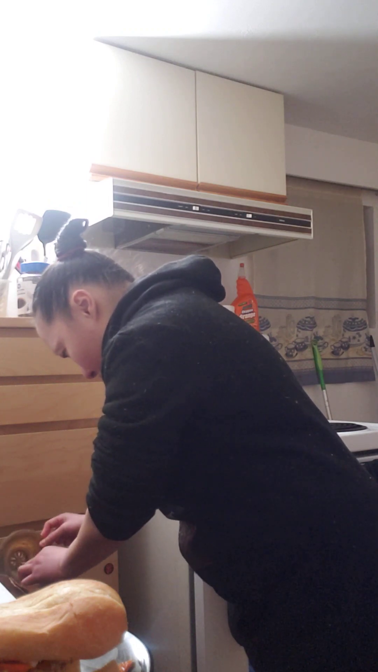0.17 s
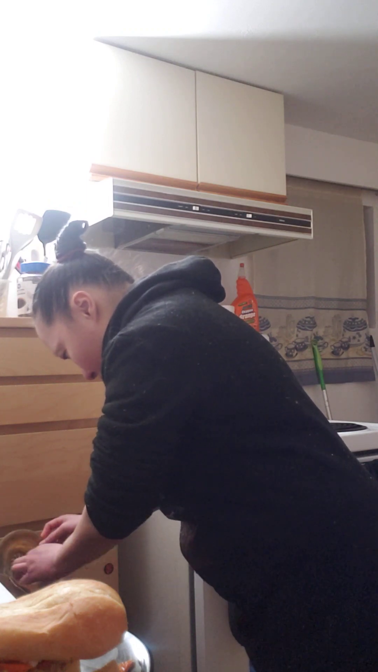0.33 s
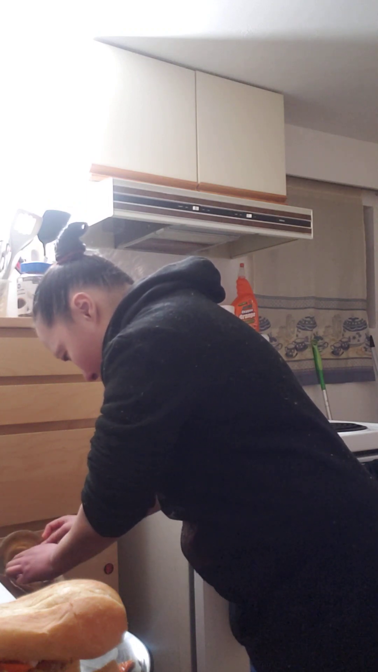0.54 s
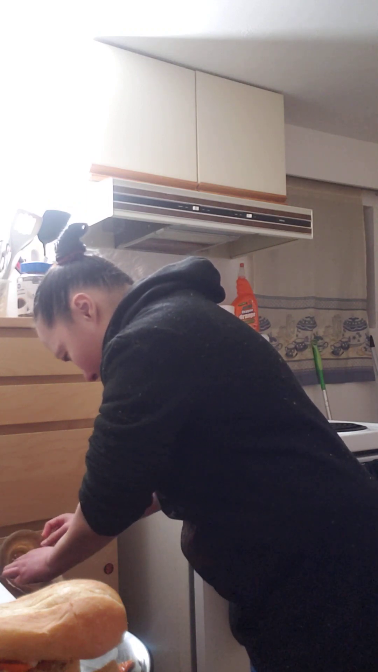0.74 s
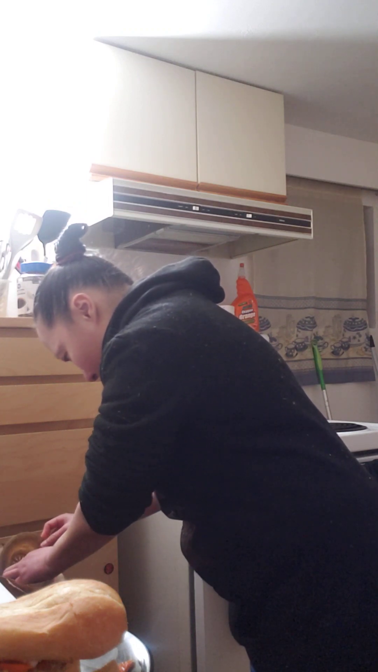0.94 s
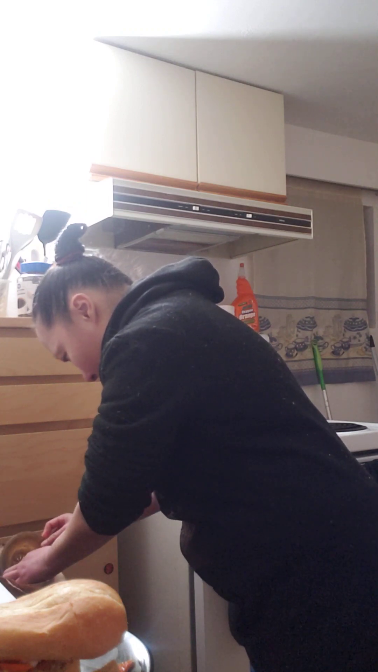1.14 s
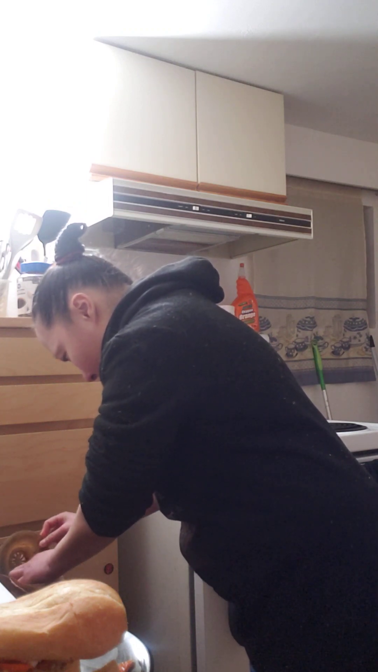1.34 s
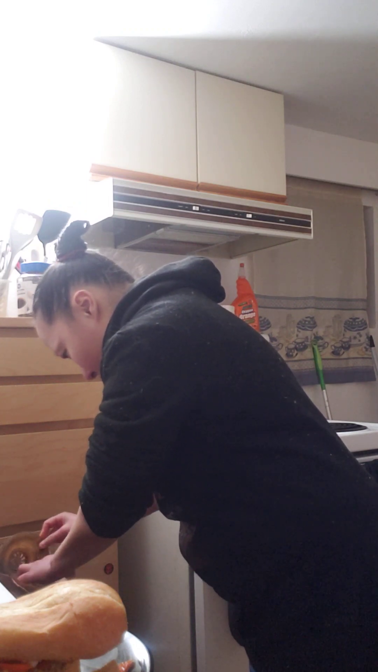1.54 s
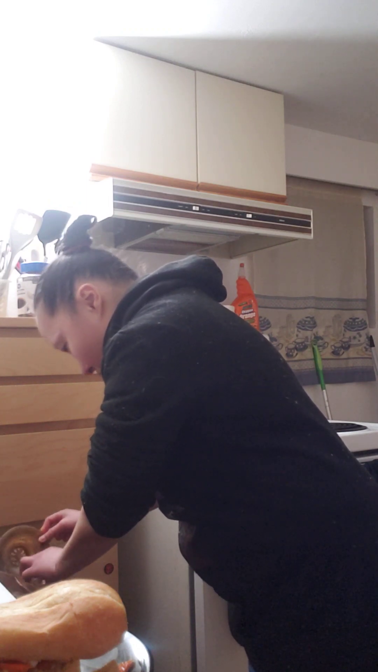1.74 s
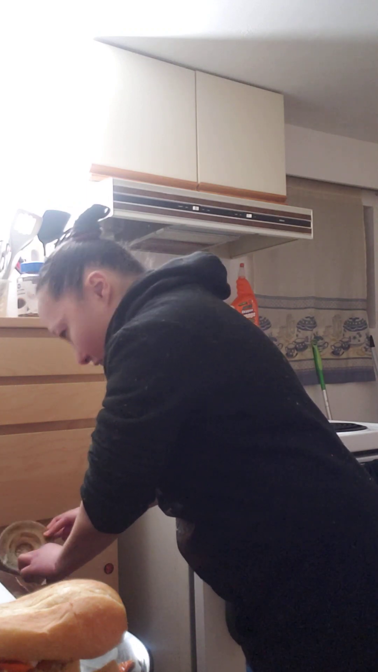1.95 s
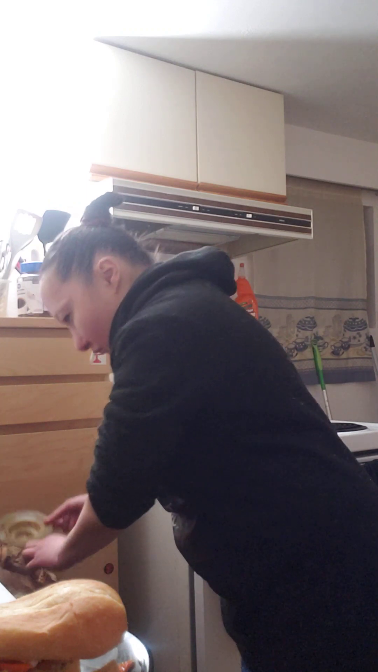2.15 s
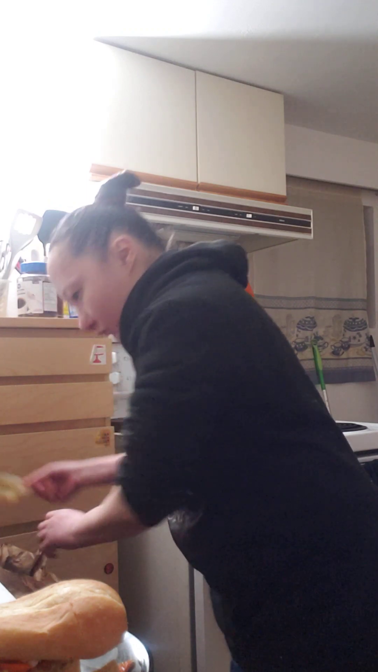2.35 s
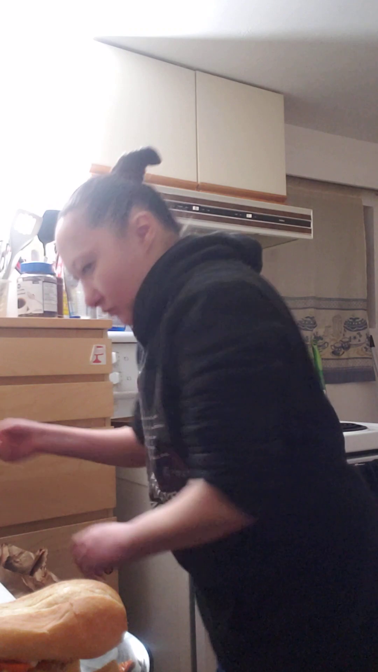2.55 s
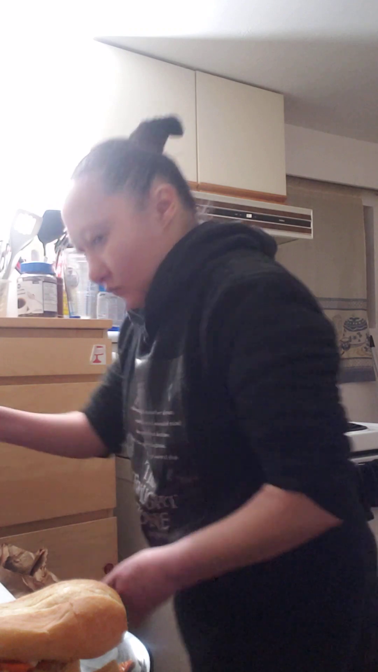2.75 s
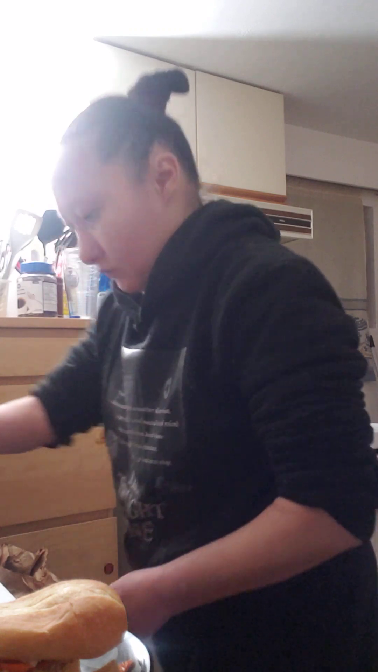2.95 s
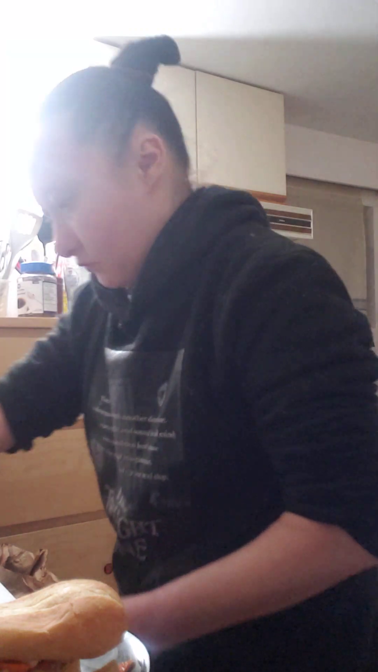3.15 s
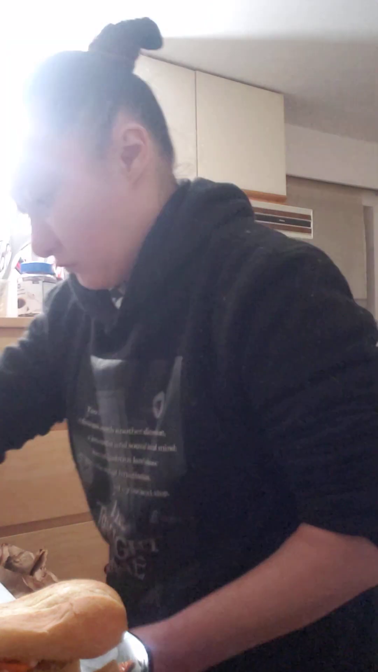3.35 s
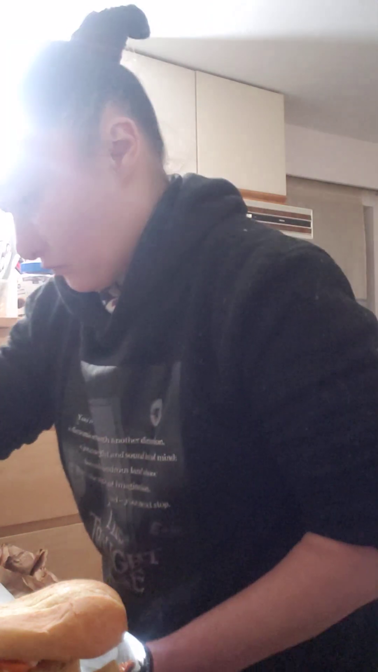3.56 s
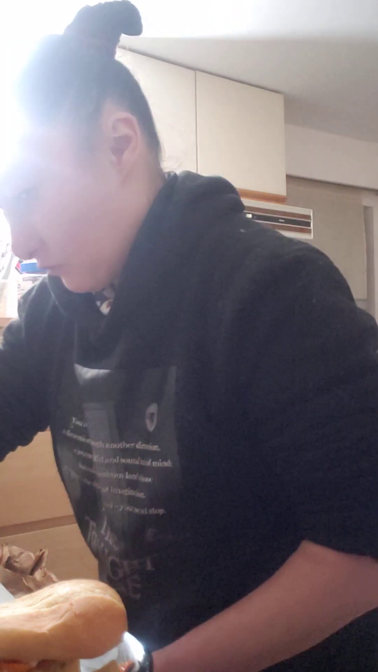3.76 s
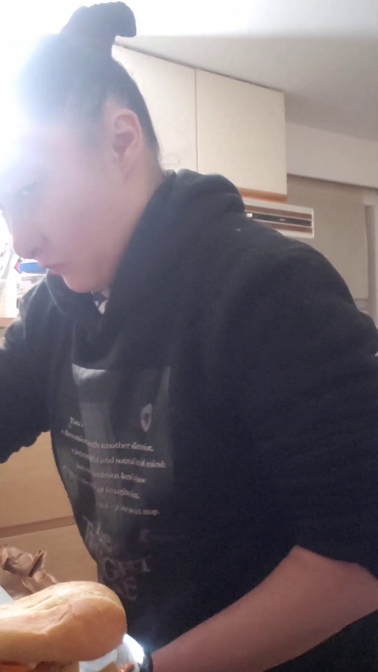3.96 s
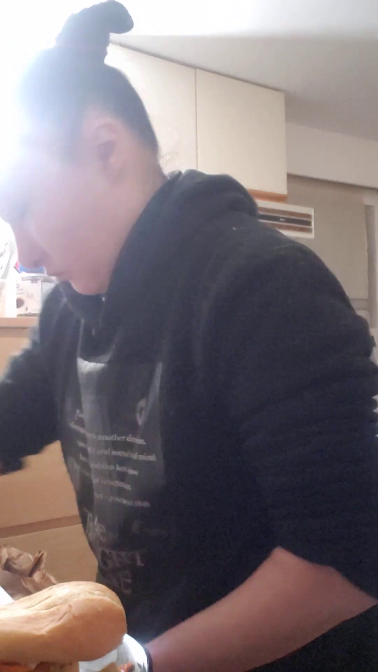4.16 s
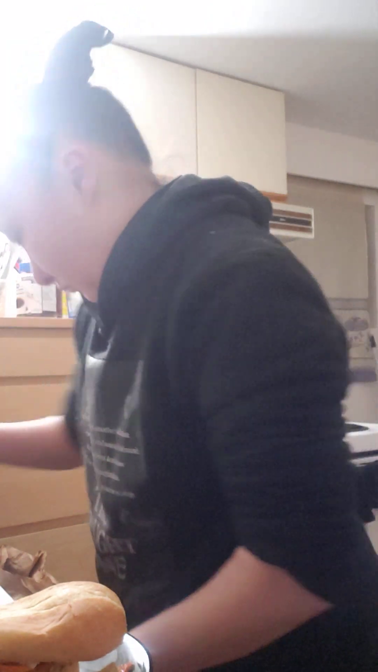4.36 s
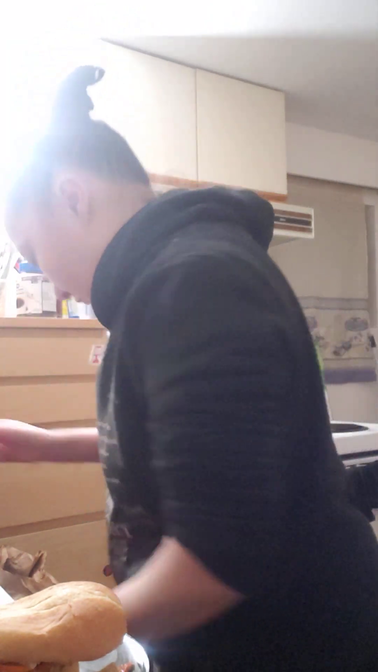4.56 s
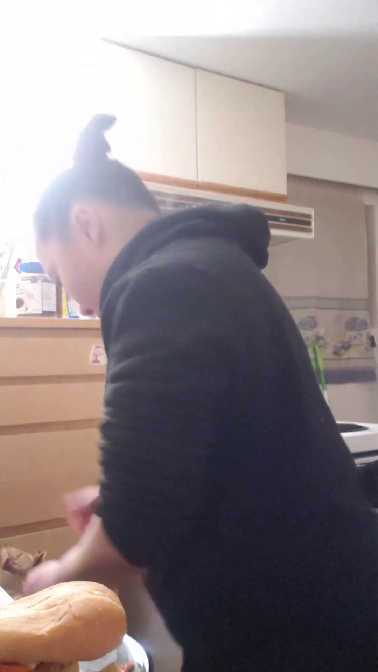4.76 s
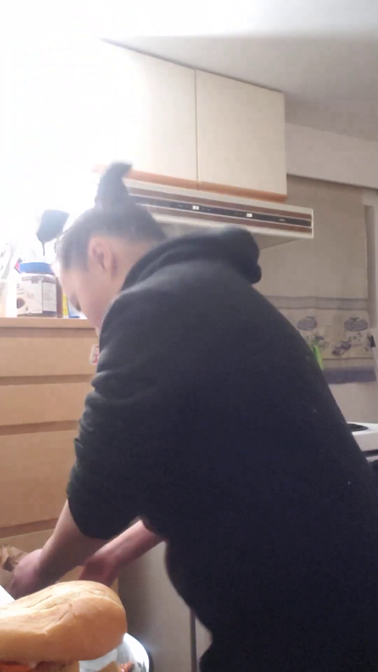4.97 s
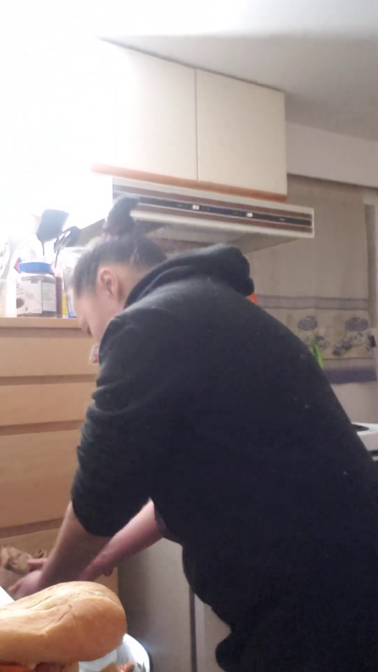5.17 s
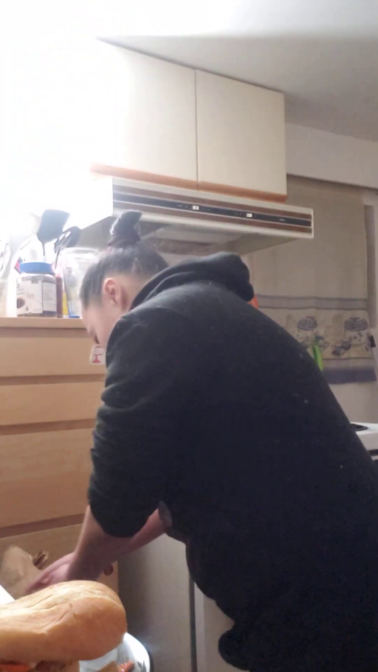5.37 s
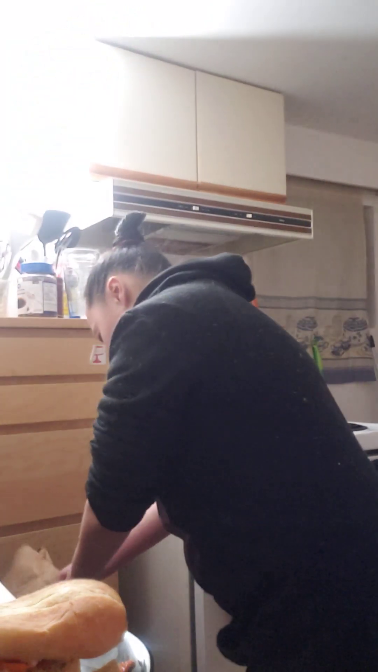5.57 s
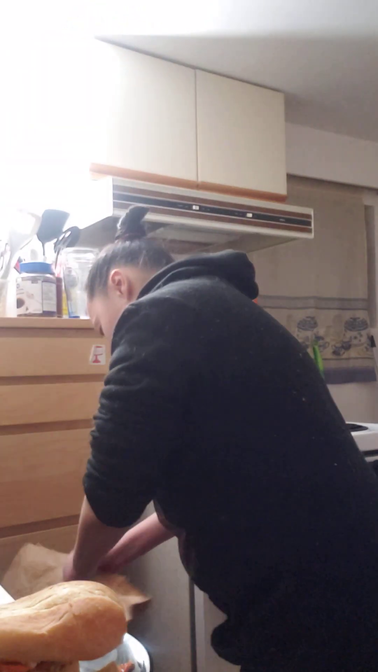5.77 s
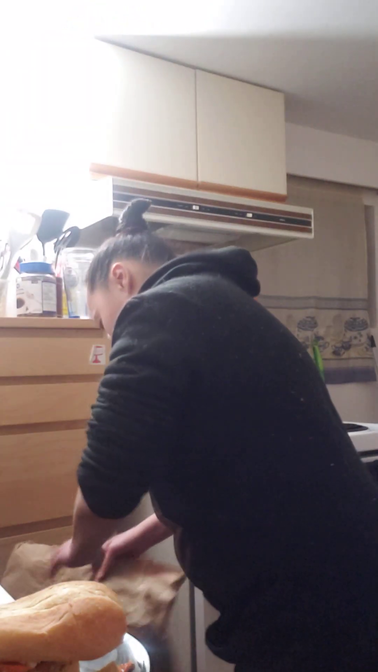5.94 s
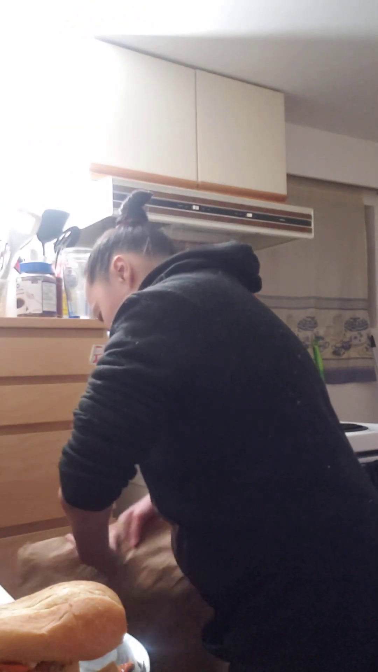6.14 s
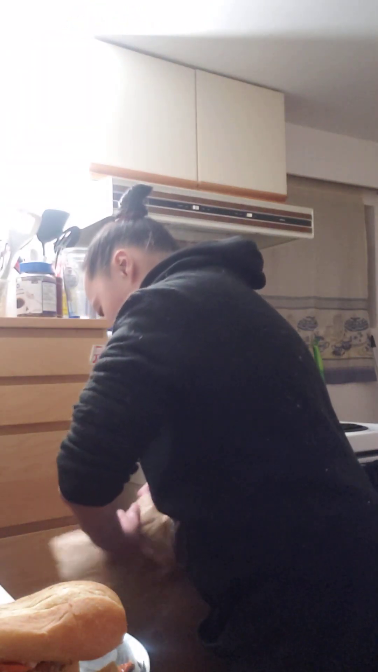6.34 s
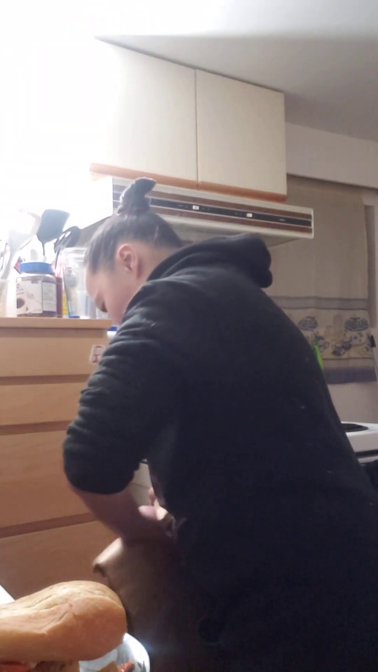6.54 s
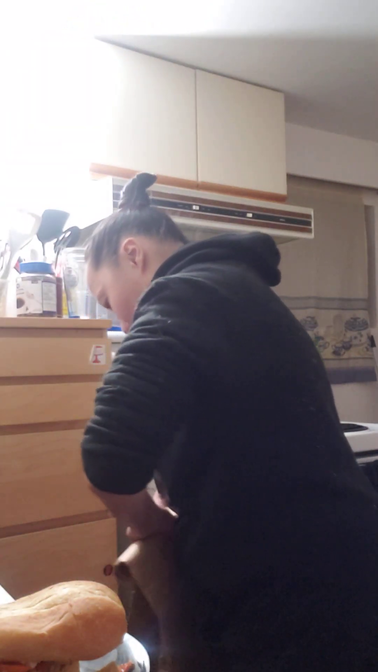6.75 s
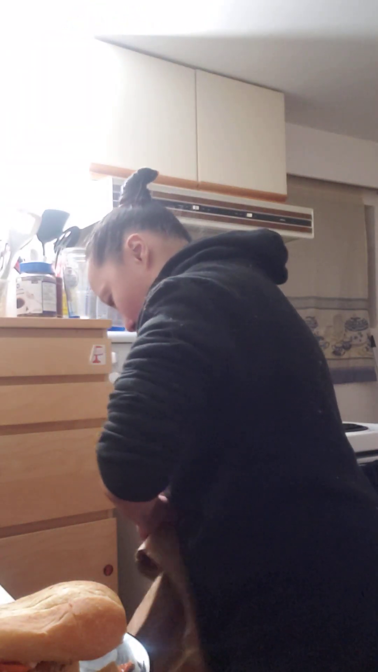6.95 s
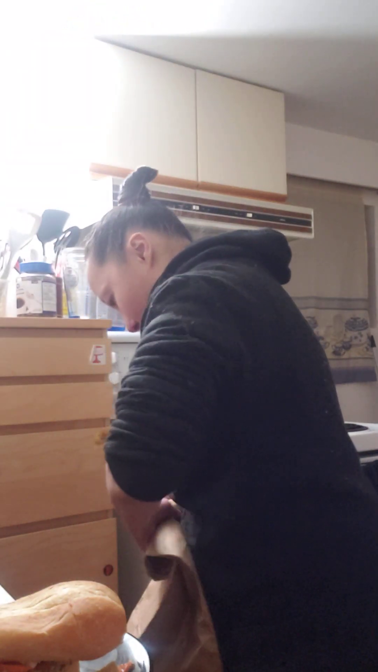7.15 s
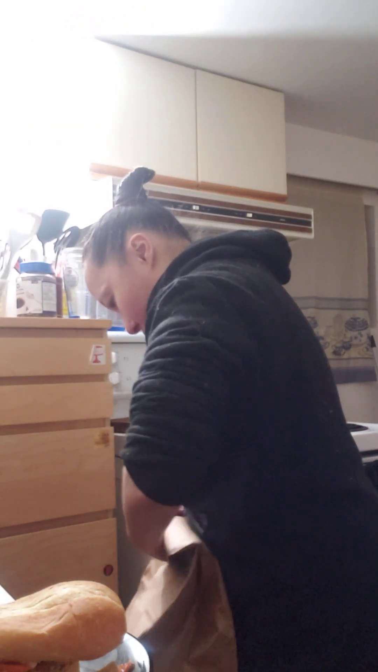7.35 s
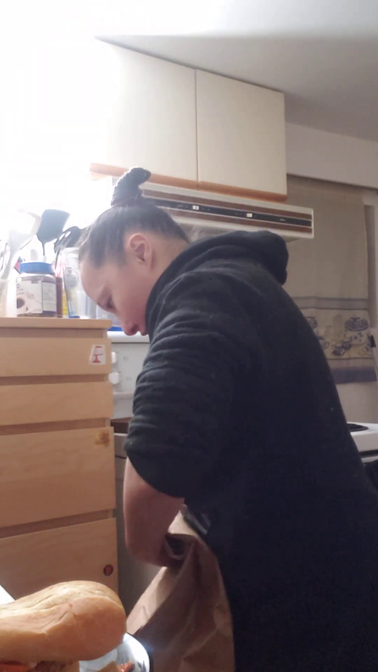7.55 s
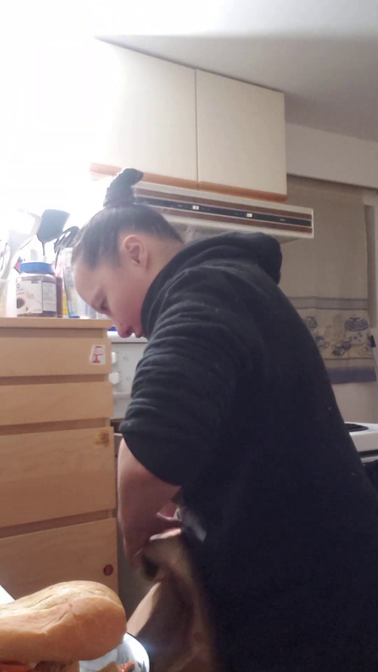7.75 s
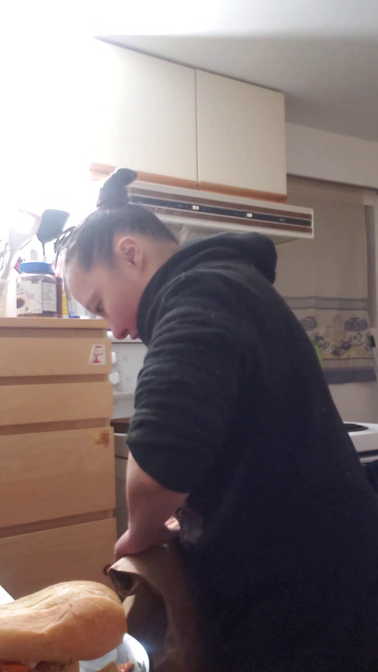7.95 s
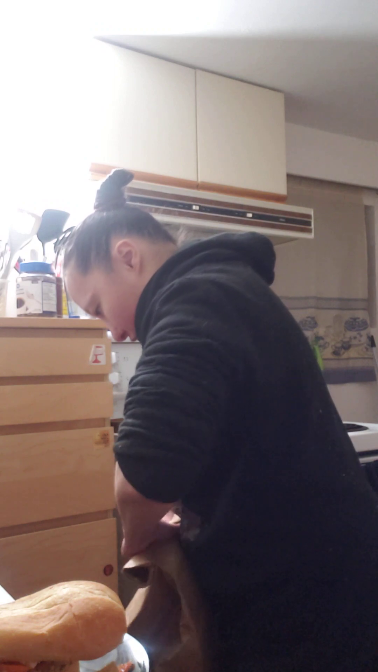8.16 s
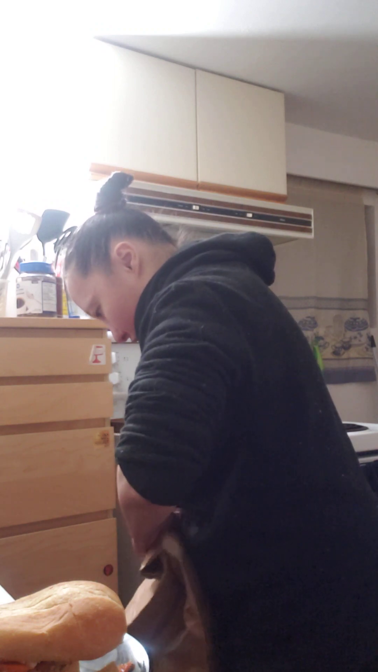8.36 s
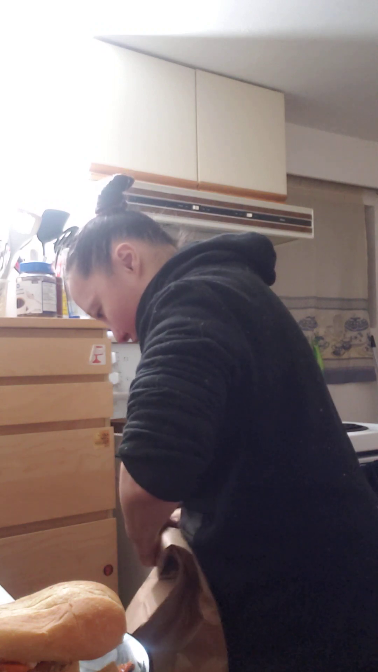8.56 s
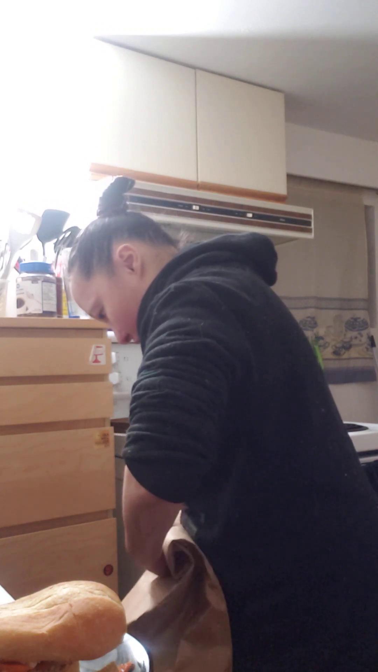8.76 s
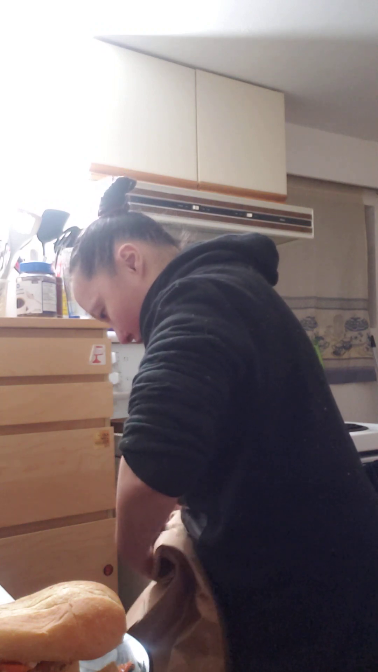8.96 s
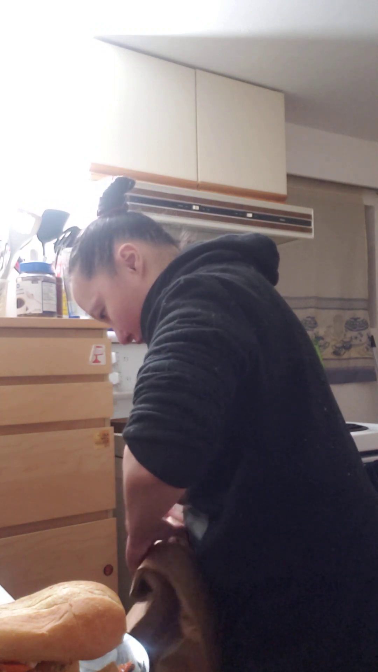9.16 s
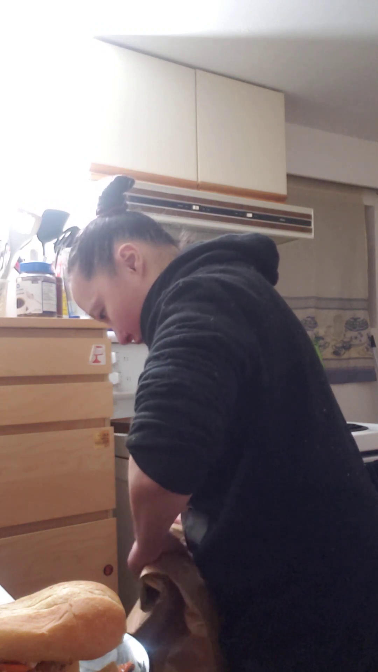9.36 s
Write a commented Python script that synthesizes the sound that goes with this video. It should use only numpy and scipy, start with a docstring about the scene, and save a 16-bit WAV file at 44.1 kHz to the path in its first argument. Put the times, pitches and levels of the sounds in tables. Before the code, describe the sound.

In a small kitchen, a thin wrapper rustles quietly while things are tapped down on a counter. After a lull, one object lands with a sharp knock. Then a paper bag is gripped, lifted and folded, crackling and snapping loudly with hollow pops and a few dull bumps. A fridge hums faintly throughout, and the microphone picks up the handling with a short room echo.

```python
"""A thin wrapper rustles over a fridge's hum in a small kitchen; things are tapped down, one knocked hard.
Then a paper bag, the loudest source, is gripped, lifted and folded: buckling creases snap and crackle,
its walls flap and pop, the air inside resonates, and its weight bumps the counter.
Impacts excite the counter's damped modes. Two microphones hear the handling mostly as reverberation."""
import sys
import numpy as np
from scipy import signal
from scipy.fft import rfft, irfft
from scipy.io import wavfile

SR = 44100
rng = np.random.default_rng(int(sys.argv[2]) if len(sys.argv) > 2 else 0)


def inscribe(sig):
    """Save sig as 16-bit PCM at rate SR to the path in sys.argv[1].

    A 1-D sig is mono; a 2-D sig holds one channel per row.
    Samples are clipped to [-1, 1] before scaling.
    """
    pcm = np.round(np.clip(np.atleast_2d(sig).T, -1, 1) * 32767)
    wavfile.write(sys.argv[1], SR, pcm.astype(np.int16))


N = 414981

# squeezes of the bag: start_s, length_s, crackle_db, relative_treble_db, flap_db
SQUEEZES = [(5.22, .09, -55.5, 2, -64), (5.298, 0.11, -49, -10, -50.5), (5.377, 0.03, -48, 2, -47.5),
            (5.514, 0.044, -44, -3, -41.5), (5.59, 0.13, -51, -1.5, -66), (5.707, 0.033, -41.5, 0, -49.5),
            (5.814, 0.052, -44, -2.5, -43.5), (6.098, 0.029, -53, -16, -63), (6.216, 0.044, -51, -5, -53),
            (6.257, 0.017, -40, -8, -42.5), (6.357, 0.04, -58, 0, -46.5), (6.411, 0.067, -37.5, -3, -39),
            (6.462, 0.029, -38, -2.5, -37), (6.566, 0.18, -49.5, -5, -43.5), (6.688, 0.046, -40, -3, -37),
            (6.731, 0.071, -39, -1.5, -40), (6.852, 0.13, -45, -4, -40), (7.018, 0.11, -41.5, -1.5, -38.5),
            (7.067, 0.098, -37.5, -2, -38), (7.223, 0.044, -35.5, 1, -36.5),
            (7.384, 0.13, -37.5, -2.5, -35), (7.536, 0.13, -37, -2.5, -39.5),
            (7.667, 0.066, -38.5, -1, -40.5), (7.737, 0.17, -43.5, 4, -44.5), (7.887, 0.036, -42, -7, -44),
            (7.97, 0.051, -50, -14, -39), (8.126, 0.077, -42.5, -6, -44.5), (8.231, 0.092, -34.5, 0, -35),
            (8.362, 0.11, -41, -3, -41), (8.46, 0.13, -42.5, 0, -43), (8.602, 0.096, -43.5, -5, -39.5),
            (8.721, 0.015, -38.5, 0, -33), (8.799, 0.066, -39.5, -19, -35), (8.86, 0.053, -38, -15, -36),
            (8.948, .07, -41.5, -5, -37.5), (9.059, 0.054, -37, 1, -40.5), (9.108, 0.096, -41, -2, -39.5),
            (9.243, 0.087, -37.5, -4, -35), (9.39, .015, -28, 0, -40)]
# the bag swaying in the hands: time_s, rustle_db, hollow_db, bump_db
SWAY = [(5.2, -71, -58.5, -59), (5.28, -50, -50.5, -53), (5.5, -55.5, -57, -53), (5.84, -51, -44.5, -59),
        (5.95, -64, -60.5, -53), (6.07, -65.5, -80, -76), (6.2, -67, -58, -66), (6.3, -66, -54, -60),
        (6.45, -54, -43.5, -47), (6.62, -60, -51, -60), (6.72, -49, -44.5, -44), (7.0, -62, -49, -50.5),
        (7.45, -42, -42, -44), (7.7, -53, -44.5, -44), (7.92, -56, -46, -53.5), (8.1, -49, -45.5, -49),
        (8.25, -48, -42.5, -51), (8.4, -54, -52, -51.5), (8.85, -46, -43, -44.5), (9.2, -42, -49, -49),
        (9.41, -58, -43, -47)]
def bag():
    """Forced vibration: squeezing and swaying, added in power, drive creases, walls and enclosed air."""
    start_s, length_s, crackle_db, treble_db, flap_db = np.transpose(SQUEEZES)
    level, top, flap = (bursts(start_s, length_s, db, rise_s=0.01, fall_db_per_s=209)
                        for db in (crackle_db, crackle_db + treble_db, flap_db))
    held, rustle_db, hollow_db, _ = curves(SWAY)
    rustle = held * gain_of(rustle_db)
    paper = creases(np.hypot(level, rustle), np.hypot(top, rustle))
    pushes = crackle(per_s=1100, spread_db=2.85, clump_s=0.039, clump_db=1.57)
    flapping = walls(pushes * np.hypot(flap, rustle * gain_of(-2.5)))
    return paper + flapping + hollow(held * pushes * gain_of(hollow_db))

# spectrum of a buckling crease: frequency_hz, density_db
CREASE_SPECTRUM = [(880, -37.5), (1500, -3), (1670, -2.5), (2300, -6), (4420, -2), (7390, -5.5),
                   (8160, -9.5), (9010, -7), (12400, -9), (15200, -12), (16000, -12)]
def creases(level, top):
    """Buckling avalanches: creases give way in clumps of clicks, louder just after a snap."""
    clicks = crackle(per_s=2800, spread_db=2.8, clump_s=0.008, clump_db=1.8)
    return with_treble(colour(clicks, CREASE_SPECTRUM), top / level) * level * (0.57 + 0.5 * aftermath())

# spectrum of a paper wall: frequency_hz, density_db
WALL_SPECTRUM = [(320, -22.5), (550, -6.5), (603, -11), (762, -0.5), (1030, -6), (1200, -2.5), (1450, -8),
                 (1680, -7.5), (3000, -13), (3900, -24.5), (6600, -120)]
def walls(pushes):
    """Panel radiation: the walls turn pushes into midrange flapping."""
    return colour(pushes * (0.83 + 0.16 * aftermath()), WALL_SPECTRUM)

# modes of the air in the bag: pitch_hz, bandwidth_hz, level_db
CAVITY_MODES = [(265, 38, -9.5), (338, 75, -8.5), (428, 36, -0.5), (482, 43, -4), (556.6, 37, -10.5)]
def hollow(puffs):
    """Cavity resonance: puffs ring the air's modes, summed with alternating polarity."""
    return sum((-1) ** k * gain_of(db) * resonate(puffs, hz, width_hz)
               for k, (hz, width_hz, db) in enumerate(CAVITY_MODES))

# single creases giving way: start_s, level_db, pitch_hz, relative_flap_db, relative_treble_db
SNAPS = [(5.217, -57, 9680, -11, 1), (5.231, -60, 5560, -6, -12), (5.2604, -54, 4080, -14, -12),
         (5.3244, -30, 2230, -7, -24), (5.336, -28.5, 2110, -6, -33), (5.5369, -30, 2480, -11, -24),
         (5.628, -35.5, 4600, 2, 3), (5.757, -27.5, 2820, -2.5, -10), (5.8276, -31.5, 4740, -17, 3),
         (6.113, -37.5, 5130, -5, -11), (6.2242, -43, 2180, 4, -8), (6.269, -30, 5100, -10, -1.5),
         (6.349, -36.5, 12900, 2.5, 3), (6.4094, -23.5, 6450, -9, -4), (6.4534, -24, 3250, -21, -5),
         (6.4796, -16, 2520, -9.5, -6), (6.565, -28, 2880, -20, -6.5), (6.6924, -29, 3130, 2.5, -0.5),
         (6.734, -24.5, 2700, -5.5, -0.5), (6.8054, -23, 2020, -29, -14), (6.8624, -37.5, 2740, 9.5, -18),
         (6.9339, -34.5, 2440, -4, 2), (6.974, -30, 2840, -0.5, -25), (7.015, -20.5, 1970, -21, -21),
         (7.0754, -33, 5300, -9, -15), (7.216, -32, 2350, -3, -19), (7.2386, -25, 10200, -22, -0.5),
         (7.3201, -25, 2600, -1.5, -27), (7.3684, -21.5, 2120, -11.5, -22), (7.4041, -14, 3800, -17, -9),
         (7.4396, -17, 2090, -7, -26), (7.546, -19, 4250, -11, -7.5), (7.5664, -20.5, 4070, -8, -6),
         (7.6574, -19, 2400, -17, -5.5), (7.7238, -32.5, 2080, 3, -14), (7.9014, -23, 4930, -3, -11),
         (7.91, -25.5, 2520, -18, -16), (7.9934, -29, 2570, -12, -20), (8.062, -42, 2860, 10.5, -18),
         (8.1304, -25, 2800, -9, -20), (8.1776, -25, 2170, -7, -23), (8.2207, -22, 2500, -2, -12),
         (8.2425, -21, 12800, -33, -2), (8.452, -27.5, 3100, -1, -3), (8.539, -29.5, 2050, -1, -2),
         (8.5951, -23.5, 3130, -5.5, -19), (8.6484, -25.5, 1970, -0.5, -7.5), (8.7031, -31, 2400, -13, -16),
         (8.7273, -26, 4760, -15, -13), (8.744, -15.5, 7700, -26, -12), (8.7987, -24, 6410, -21, -15),
         (8.8204, -31, 2000, -11, -17), (8.8747, -23, 2850, -1.5, -19), (9.008, -27, 2020, -17, -14),
         (9.0444, -27.5, 9010, -20, -1.5), (9.0673, -23.5, 4720, -2.5, -1.5), (9.2374, -31.5, 2560, 8, -17),
         (9.2532, -29, 2000, -6, -9), (9.2828, -20.5, 2060, -6, -20), (9.3974, -15.5, 2500, -5, -22)]
def snaps():
    """Sudden buckling: an impulse rings a crease at its own pitch and kicks the wall."""
    body, top, kick = np.zeros((3, N))
    click = signal.unit_impulse(400)
    for s, db, hz, flap_db, treble_db in SNAPS:
        add(body, s, gain_of(db + 11) * (click + 0.31 * resonate(click, hz, 0.25 * hz)))
        add(top, s, gain_of(db + treble_db + 27) * click)
        add(kick, s, gain_of(db + flap_db + 18.5) * click)
    return colour(crossover(body, top, 12700), CREASE_SPECTRUM) + colour(kick, WALL_SPECTRUM)

def aftermath(fade_s=0.03):
    """Relaxation: a snap sets off neighbouring creases; their activity peaks at 1 and fades."""
    t, start_s = np.arange(N) / SR, np.transpose(SNAPS)[0]
    latest_s = start_s[np.maximum(np.searchsorted(start_s, t) - 1, 0)]
    return np.exp(-abs(t - latest_s) / fade_s)

# walls popping in or out: start_s, level_db, pitch_hz
POPS = [(5.323, -22.5, 1300), (5.538, -29, 420), (6.347, -24.5, 854), (6.476, -23, 796),
        (6.628, -28.5, 487), (6.69, -23, 505), (6.863, -19.5, 475), (7.054, -28, 460), (7.116, -21, 444),
        (7.242, -24.5, 437), (7.287, -28, 444), (7.367, -23.5, 450), (7.447, -18, 487), (7.521, -23, 500),
        (7.566, -20, 814), (7.657, -19.5, 450), (7.877, -17.5, 600), (7.995, -19, 794), (8.286, -28, 482),
        (8.467, -20, 486), (8.54, -22.5, 428), (8.594, -29, 470), (8.704, -21, 437), (8.805, -24, 450),
        (8.868, -16, 492), (8.969, -22.5, 730), (9.066, -17.5, 470), (9.118, -19, 460), (9.202, -25.5, 440),
        (9.239, -27, 425), (9.281, -20, 430)]
def pops():
    """Snap-through: a wall of the bag flips over and booms."""
    return booms(POPS, cycles=3.6, size=2000)

# the filled bag striking the counter: start_s, level_db, pitch_hz
KNOCKS = [(5.329, -53, 119), (6.479, -39, 61.9), (6.798, -34, 116), (7.029, -34, 59.2),
          (7.329, -33.5, 53.5), (7.468, -34, 126), (7.509, -31, 56), (7.658, -26.5, 79), (8.27, -39, 109),
          (8.594, -33, 70.0), (8.719, -35, 87.5), (9.062, -35, 140), (9.279, -37, 143)]
def knocks():
    """Damped impact: each knock of the bag dies within a few bass cycles."""
    return 0.62 * booms(KNOCKS, cycles=2.16, size=9000)

# spectrum of the bag bumping the counter: frequency_hz, density_db
BUMP_SPECTRUM = [(15, -45), (25, 12), (41, -12), (65, -2.5), (91, 0.5), (155, 1), (167, -0.5), (200, -42),
                 (260, -30), (440, -120)]
def bumps():
    """Random excitation: small bumps of the swaying bag merge into a rumble."""
    held, _, _, bump_db = curves(SWAY)
    contacts = crackle(per_s=300, spread_db=1.1, clump_s=0.0079, clump_db=0.3)
    return held * colour(contacts * gain_of(bump_db), BUMP_SPECTRUM, size=8192)

# things set down: start_s, level_db, pitch_hz, thud_db, relative_treble_db
TAPS = [(0.174, -52, 1150, -54, -9), (0.273, -65, 1080, -46, -11), (0.317, -34, 1050, -38, -15),
        (0.704, -53, 1260, -60, -22), (0.961, -54, 1110, -63, -10), (1.37, -50, 1140, -44, -13),
        (1.772, -37.5, 1870, -37, -20), (2.198, -32.5, 850, -47, -32), (2.268, -62, 832, -49, -11),
        (3.574, -41, 1500, -32.5, -18), (3.592, -41.5, 988, -26.5, -29), (3.847, -60, 888, -30, -20),
        (4.007, -19.5, 1090, -13.5, -3), (4.021, -21.5, 1050, -54, -27), (4.045, -35, 1050, -40, -4),
        (4.38, -72, 824, -43, -16)]
# spectrum of their contact: frequency_hz, density_db
CONTACT_SPECTRUM = [(290, -26), (500, -2.5), (1210, -3.5), (1360, 1), (1530, -4), (2100, -3.5), (4030, -10),
                    (12900, -8.5), (16000, -14)]
def taps():
    """Impact and free vibration: returns the contact clicks and the objects' brief rings."""
    body, top, rings = np.zeros((3, N))
    click = signal.unit_impulse(800)
    for s, db, hz, _, treble_db in TAPS:
        add(body, s, gain_of(db + 12) * click)
        add(top, s, gain_of(db + treble_db + 22.5) * click)
        add(rings, s, gain_of(db + 14.5) * resonate(click, hz, 0.18 * hz))
    return colour(crossover(body, top, 3000), CONTACT_SPECTRUM), rings

# modes of the counter: pitch_hz, level_db, t60_s
COUNTER_MODES = [(56, -4, 0.29), (124, -2.5, .25), (144.3, 2, 0.32), (195, 5.5, 0.088), (224.5, -3.5, 0.34),
                 (275.7, 0.5, 0.31), (338, -5.5, 0.4), (369.6, -1.5, 0.31), (438, -6.5, 0.36),
                 (539, -11, 0.2), (598, -18, .15), (1090, -10, 0.05)]
def counter():
    """Modal superposition: the counter thuds under each tap as a sum of decaying sines."""
    out, t = np.zeros(N), np.arange(SR // 2) / SR
    ring = sum(gain_of(db - 60 * t / t60) * np.sin(2 * np.pi * hz * t) for hz, db, t60 in COUNTER_MODES)
    ring = ring / abs(ring).max() * np.minimum(t / 0.0038, 1)
    for s, _, _, thud_db, _ in TAPS:
        add(out, s, gain_of(thud_db) * ring)
    return out

# rustles of the wrapper: start_s, length_s, crackle_db, relative_treble_db, fold_db
RUSTLES = [(-0.04, 0.078, -72, 8.5, -60), (0.025, 0.096, -72, 8.5, -67), (0.146, 0.038, -65, -5, -63),
           (0.25, 0.076, -63.5, 10, -55.5), (0.3, 0.035, -49, -6, -57), (0.338, 0.092, -58.5, 5, -56.5),
           (0.498, 0.36, -84, 7.5, -79), (0.692, 0.028, -74, -6, -61), (0.941, 0.028, -66.5, 8.5, -61.5),
           (1.067, 0.07, -75, 8.5, -64.5), (1.34, 0.3, -58, 2.5, -60.5), (1.613, 0.13, -60.5, -0.5, -60),
           (1.746, 0.033, -51, 0.5, -49), (1.888, 0.14, -76, 8.5, -69.5), (2.107, 0.079, -67.5, 8.5, -75),
           (2.152, 0.032, -52.5, -1.5, -49), (2.232, 0.013, -69, 14.5, -76), (2.74, .07, -80, 6, -80),
           (2.85, .06, -84, 2, -65), (2.925, 0.068, -66.5, 0, -64), (3.564, .03, -72, -3, -57),
           (3.83, 0.19, -85, 10, -71.5)]
# spectra of its film and its folds: frequency_hz, density_db
FILM_SPECTRUM = [(1180, -40), (2000, 2), (3770, -3), (4450, 3), (7000, -1), (8330, -7), (12500, -7),
                 (15100, -12), (16000, -10)]
FOLD_SPECTRUM = [(350, -31), (600, -3), (875, -0.5), (1360, -5), (1650, -5.5), (2070, -19), (3000, -25.5),
                 (3900, -31), (6600, -120)]
def wrapper():
    """Crumpling: the same dense clicks excite the bright film and its duller folds."""
    clicks = crackle(per_s=2500, spread_db=3.2, clump_s=0.0017, clump_db=1.04)
    start_s, length_s, crackle_db, treble_db, fold_db = np.transpose(RUSTLES)
    level, top, folds = (bursts(start_s, length_s, db, rise_s=0.023, fall_db_per_s=217)
                         for db in (crackle_db, crackle_db + treble_db, fold_db))
    film = with_treble(colour(clicks, FILM_SPECTRUM), top / level)
    return level * film + folds * colour(clicks, FOLD_SPECTRUM)

# likeness of the echoes at the two microphones: frequency_hz, correlation
ROOM_CORRELATION = [(60, 1), (100, 0.32), (180, 0.96), (310, 1), (550, 0.79), (950, -0.42), (1650, 0.25),
                    (2860, -0.11), (4970, 0.081), (8640, 0.059), (15000, -0.2)]
# their balance: frequency_hz, left_over_right_db
ROOM_BALANCE = [(60, -6), (110, 0), (200, 0), (380, -1.5), (700, -5), (1290, -2), (2380, 1.0), (4400, 3.5),
                (8120, 2.5), (15000, 1)]
# reverberation time: frequency_hz, t60_s
ROOM_T60 = [(60, 0.12), (250, 0.37), (1000, 0.33), (4000, 0.27), (15000, 0.17)]
def kitchen(x, patterns=8, direct_db=-9, turn_s=0.03):
    """Reverberation: direct sound, early echoes and a tail; echo patterns crossfade to avoid ringing."""
    out, turn = np.zeros((2, N)), np.arange(N) / SR / turn_s
    for k in range(patterns):
        echoes = np.zeros((2, SR // 2))
        slots = np.arange(60, SR // 2 - 12, 12)
        arrivals = slots + rng.integers(0, 12, (2, len(slots)))
        np.put_along_axis(echoes, arrivals, rng.choice([-1., 1.], arrivals.shape), 1)
        hz, t, (left, other) = signal.stft(echoes, SR, nperseg=256)
        hz = hz[:, None]
        right = correlated(left, other, read(ROOM_CORRELATION, hz))
        tilt = gain_of(read(ROOM_BALANCE, hz) / 2)
        decay = gain_of(-60 * t / read(ROOM_T60, hz)) * (1 + 1.2 * np.exp(-t / 0.0072))
        response = signal.istft(np.array([left * tilt, right / tilt]) * decay, SR, nperseg=256)[1]
        response /= np.sqrt((response ** 2).sum(1).mean())
        response[[0, 1], [4 + 2 * k, 0]] += gain_of(direct_db)  # the left microphone is farther
        away = (turn - k) % patterns - 1
        crossfade = np.cos(np.pi / 2 * np.clip(away, -1, 1))  # constant power
        out += signal.oaconvolve((x * crossfade)[None], response, axes=1)[:, :N]
    return out

# humming bands of the fridge: pitch_hz, bandwidth_hz, level_db
HUM_BANDS = [(119.2, 6.4, -69.5), (260, 52, -68), (322, 43, -67.5), (398, 76, -69.5), (481.3, 35, -68.5)]
# spectrum of its air noise: frequency_hz, density_db
AIR_SPECTRUM = [(21, -27), (35, -4.5), (54, -5.5), (75, -19), (97, -7.5), (117, 4), (141, -14),
                (184, -10.5), (205, -23.5), (282, -9.5), (352, -16), (484, -15), (541, -21.5), (800, -24),
                (3000, -49), (3900, -90), (6600, -120)]
# likeness at the two microphones: frequency_hz, correlation
AIR_CORRELATION = [(60, 1), (130, 0.99), (290, 0.95), (640, 0.76), (1410, -0.41), (3100, -0.23),
                   (6820, -0.25), (15000, 1)]
# balance between them: frequency_hz, left_over_right_db
AIR_BALANCE = [(60, -2.5), (180, 1.5), (550, -4.5), (1650, -4.5), (4970, 25), (15000, 4.5)]
def fridge(air_db=-51):
    """Narrow-band noise: resonances hum over broad air noise, coherent between channels in the bass."""
    noise = rng.standard_normal((2, N))
    left, other = rfft(noise)
    hz = np.fft.rfftfreq(N, 1 / SR)
    right = correlated(left, other, read(AIR_CORRELATION, hz)) / gain_of(read(AIR_BALANCE, hz))
    pair = irfft([left, right], N)
    out = gain_of(air_db) * shaped(pair, AIR_SPECTRUM)
    for pitch_hz, width_hz, db in HUM_BANDS:
        band = resonate(resonate(pair, pitch_hz, width_hz), pitch_hz, 3 * width_hz)
        out += gain_of(db) * band / band[0].std()
    return out

# spectrum of the microphone noise: frequency_hz, density_db
HISS_SPECTRUM = [(1180, -41), (2000, -5), (2130, -6), (2740, -5.5), (3810, -7), (4080, -8.5), (5880, -11),
                 (9330, -8), (13600, -0.5), (16000, -7)]
def hiss(level_db=-75.5):
    """Self-noise: each microphone adds its own uncorrelated hiss."""
    return gain_of(level_db) * shaped(rng.standard_normal((2, N)), HISS_SPECTRUM)

def gain_of(db):
    """Decibels to an amplitude ratio."""
    return 10 ** (np.asarray(db) / 20)

def unit_rms(x):
    """Normalisation to rms 1."""
    return x / np.sqrt(np.mean(x ** 2) + 1e-20)

def read(points, hz):
    """Interpolation on a log-frequency axis."""
    table_hz, value = np.transpose(points)
    return np.interp(np.log(hz + 1), np.log(table_hz + 1), value)

def add(mix, start_s, sound):
    """Superposition of a sound on the mix."""
    part = mix[round(start_s * SR):][:len(sound)]
    part += sound[:len(part)]

def correlated(a, b, correlation):
    """Partial coherence: blends independent noises to the given correlation with a."""
    return correlation * a + np.sqrt(1 - correlation ** 2) * b

def shaped(noise, points):
    """Zero-phase spectral shaping; rms 1."""
    return unit_rms(irfft(rfft(noise) * gain_of(read(points, np.fft.rfftfreq(N, 1 / SR))), N))

def colour(x, points, size=4096):
    """Minimum-phase filtering, falling away outside the table; white noise keeps its rms."""
    hz = np.abs(np.fft.fftfreq(size, 1 / SR))
    db = read([(0, -90), *points, (SR / 2, -90)], hz)
    log_gain = np.log(gain_of(np.maximum(db, -90)))
    response = np.fft.ifft(np.exp(log_gain - 1j * signal.hilbert(log_gain).imag)).real[:size // 2]
    return signal.oaconvolve(x, response / np.linalg.norm(response))[:len(x)]

def resonate(x, hz, width_hz):
    """Two-pole resonance; white noise keeps its rms."""
    r = np.exp(-np.pi * width_hz / SR)
    return np.sqrt(1 - r) * signal.lfilter([1, 0, -1], [1, -2 * r * np.cos(2 * np.pi * hz / SR), r * r], x)

def with_treble(x, ratio, split_hz=9000):
    """Shelving: rescales the top band by a curve, given as a ratio to the rms of x."""
    top = signal.sosfilt(signal.butter(2, split_hz, "high", fs=SR, output="sos"), x)
    return x + top * (ratio * x.std() / top.std() - 1)

def crossover(low, high, hz):
    """Complementary filtering: the lows of one signal, the highs of another."""
    return high + signal.sosfilt(signal.butter(1, hz, fs=SR, output="sos"), low - high)

def crackle(per_s, spread_db, clump_s, clump_db):
    """Poisson clicks, mostly small and a few large, swelling in clumps; rms 1."""
    clicks = (rng.random(N) < per_s / SR) * rng.standard_normal(N)
    sizes = np.minimum(rng.exponential(1, N), 4)
    clumps = unit_rms(signal.lfilter([1], [1, -np.exp(-1 / (clump_s * SR))], rng.standard_normal(N)))
    return unit_rms(clicks * gain_of(spread_db * sizes + clump_db * clumps))

def booms(events, cycles, size):
    """Damped oscillation with a soft onset at each event."""
    out, t = np.zeros(N), np.arange(size) / SR
    for s, db, hz in events:
        age = hz * t / cycles
        envelope = np.sqrt(4 * age) * np.exp(0.5 - 2 * age)
        add(out, s, gain_of(db) * envelope * np.sin(2 * np.pi * hz * t))
    return out

def curves(rows):
    """Interpolation in time: a mask for the table's span, then each column at every sample."""
    time_s, *columns = np.transpose(rows)
    t = np.arange(N) / SR
    return (t >= time_s[0]) & (t <= time_s[-1]), *(np.interp(t, time_s, c) for c in columns)

def bursts(starts_s, lengths_s, levels_db, rise_s, fall_db_per_s):
    """Incoherent addition: envelopes rise, hold and die away, and their powers add."""
    power, t = np.full(N, 1e-20), np.arange(SR // 2) / SR
    for s, length_s, db in zip(starts_s, lengths_s, levels_db):
        shape = np.minimum(t / rise_s, 1) ** 2 * gain_of(db - fall_db_per_s * np.maximum(t - length_s, 0))
        add(power, max(s, 0), shape[round(max(-s, 0) * SR):] ** 2)
    return np.sqrt(power)

def scene():
    """Transmission paths: handling reverberates, pops and rings also arrive direct, thuds only direct."""
    popping = pops()
    thuds = counter() + bumps() + knocks()
    ticks, rings = taps()
    handling = wrapper() + bag() + snaps() + ticks + 0.35 * popping + 0.86 * rings
    thuds_left = np.concatenate([np.zeros(10), thuds[:-10]])  # the left microphone is farther
    return kitchen(handling) + 0.24 * popping + 0.2 * rings + np.array([thuds_left, thuds]) + fridge()

def record(dry, low_hz=40, high_hz=15850):
    """Band limiting: the sound and the microphone hiss pass steep bass and treble cuts."""
    cut = signal.sosfilt(signal.butter(8, low_hz, "high", fs=SR, output="sos"), dry + hiss())
    return signal.oaconvolve(cut, signal.firwin(511, high_hz, window=("kaiser", 9), fs=SR)[None], "same")

dry = scene()
out = record(dry)
inscribe(out)
```